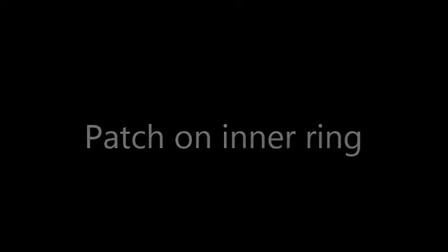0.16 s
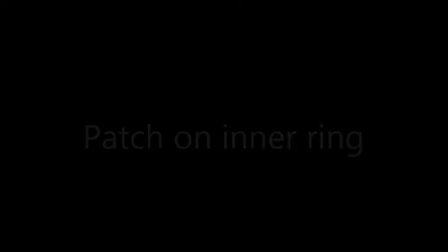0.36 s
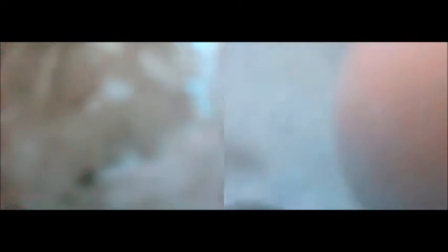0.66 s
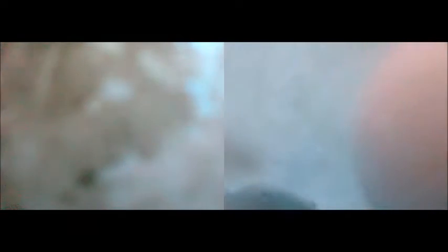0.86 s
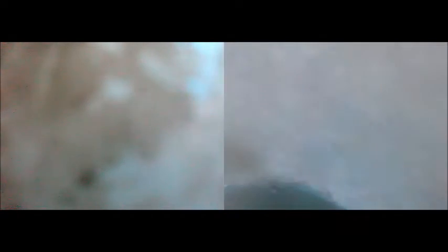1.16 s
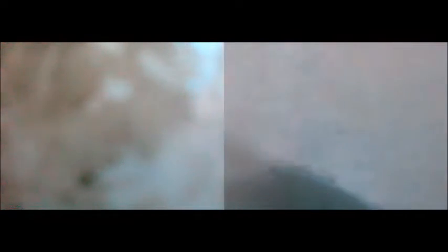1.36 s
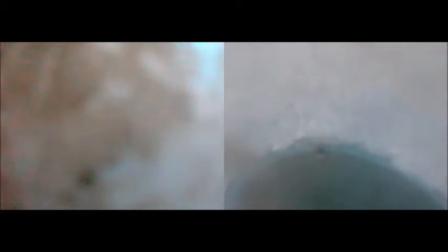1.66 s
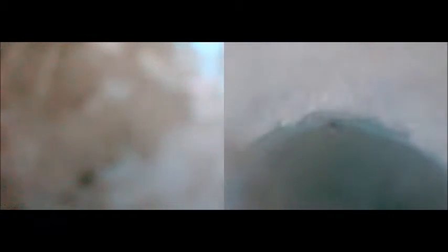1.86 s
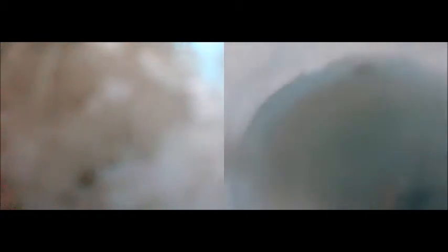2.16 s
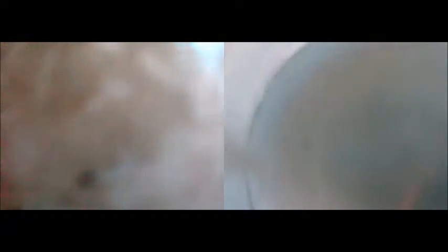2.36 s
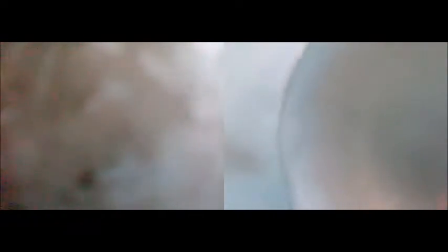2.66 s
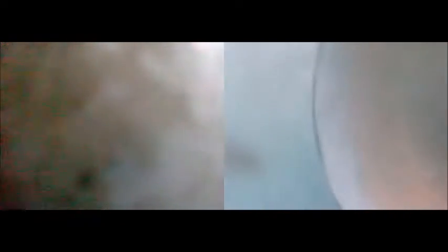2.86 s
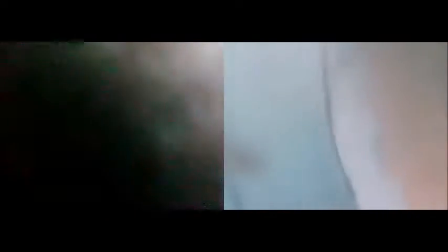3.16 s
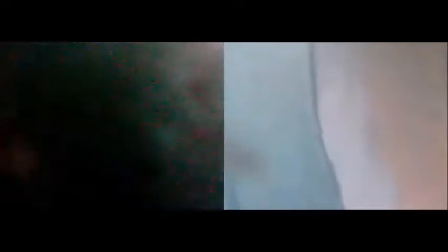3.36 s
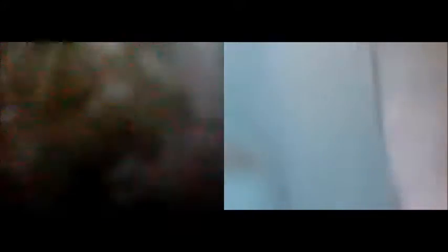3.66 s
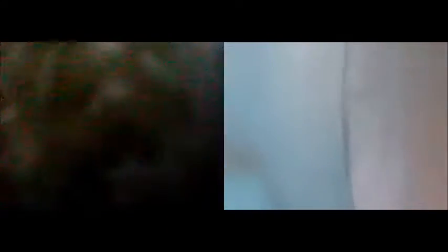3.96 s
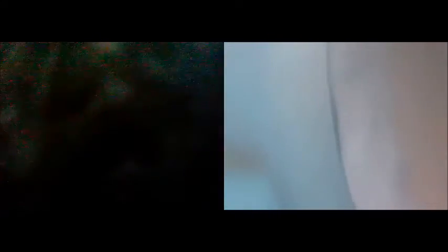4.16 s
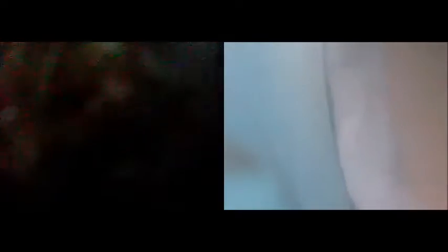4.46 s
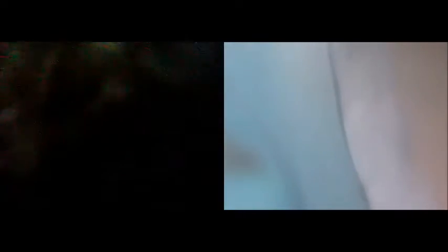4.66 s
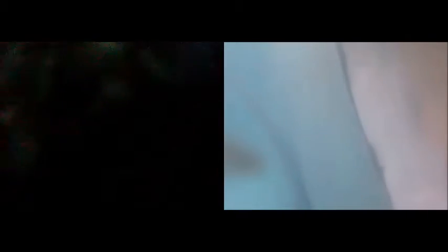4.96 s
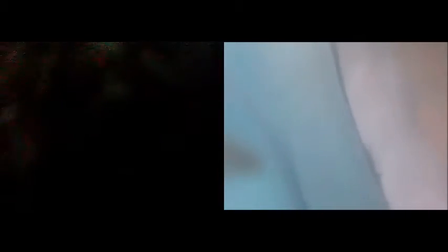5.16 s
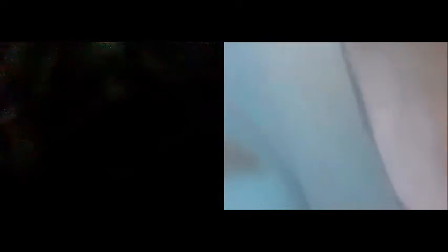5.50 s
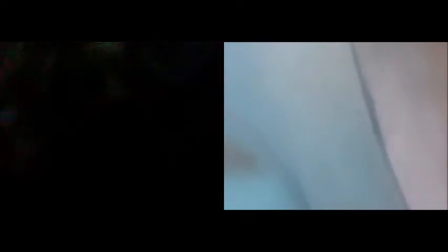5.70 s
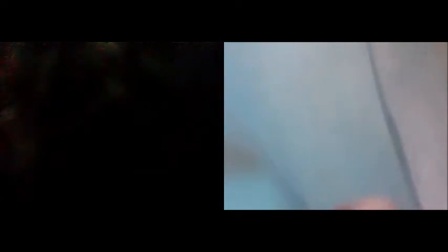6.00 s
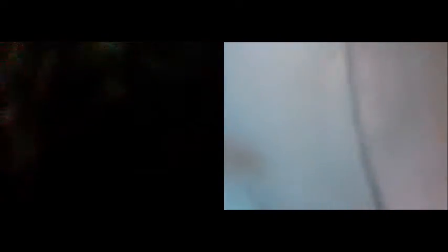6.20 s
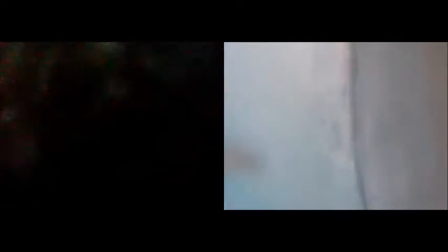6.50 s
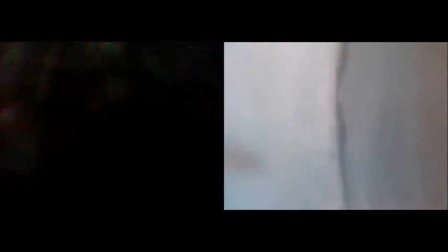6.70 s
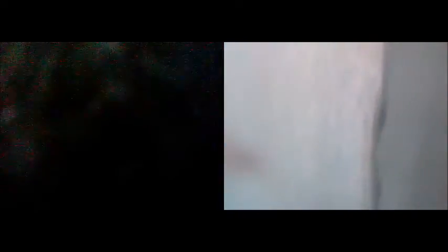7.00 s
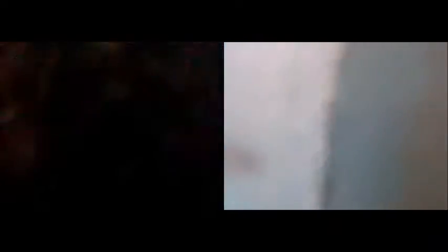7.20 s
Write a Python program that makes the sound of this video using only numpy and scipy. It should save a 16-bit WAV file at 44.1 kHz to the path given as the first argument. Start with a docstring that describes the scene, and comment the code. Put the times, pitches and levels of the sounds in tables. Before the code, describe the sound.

After brief silence, muffled underwater handling: a loud knock, gritty scrapes, a violent overloaded clatter, small bubbles, then quiet electronic pulses and a last scrape.

```python
"""After a short silence: wavering, slowly growing hum, thin tones and hiss under slow water surges, then
an on-off high whine. An underwater camera is pushed by hand along a pool liner: friction noise through
resonances makes its slides and scrapes, chattering blows on damped modes its knocks, hard enough to overload
the microphone. A few bubbles escape as rising, decaying sines. Water, hiss and whine are shaped noise;
hum and tones, sines."""
import sys
import numpy as np
from scipy import signal
from scipy.fft import rfft, irfft, next_fast_len
from scipy.io import wavfile
from scipy.ndimage import uniform_filter1d, map_coordinates

SR = 44100
rng = np.random.default_rng(int(sys.argv[2]) if len(sys.argv) > 2 else 0)


def write(x):
    x = np.atleast_2d(x).T
    wavfile.write(sys.argv[1], SR, np.round(np.clip(x, -1, 1) * 32767).astype(np.int16))


N = 323694


def amp(db):
    """Decibels to amplitude."""
    return 10 ** (np.asarray(db) / 20)


def unit(x):
    """x scaled to rms 1."""
    return x / np.sqrt(np.mean(x ** 2) + 1e-20)


def clock():
    """Time of every sample in seconds."""
    return np.arange(N) / SR


def add(track, start_s, sound):
    """Mix a sound in at start_s, cut at the end of the track."""
    part = track[round(start_s * SR):][:len(sound)]
    part += sound[:len(part)]


def wobble(knots_per_s):
    """A smooth random curve through normal random knots."""
    knots = rng.standard_normal(int(N * knots_per_s / SR) + 4)
    return map_coordinates(knots, [np.arange(N) * knots_per_s / SR], order=2)


def sine(phase):
    """A sine at rms 1."""
    return np.sqrt(2) * np.sin(phase)


def coloured(x, points, extra_db=lambda hz: 0):
    """x filtered to a curve of (freq_hz, relative level_db) points, at rms 1."""
    size = next_fast_len(len(x) + 4096)
    hz = np.fft.rfftfreq(size, 1 / SR) + 1  # + 1 keeps the logarithm finite
    point_hz, point_db = np.transpose(points)
    curve_db = np.interp(np.log(hz), np.log(point_hz), point_db)
    octaves_above = np.maximum(np.log2(hz / point_hz[-1]), 0)
    octaves_below = np.maximum(np.log2(point_hz[0] / hz), 0)
    rolloff_db = 200 * octaves_above + 20 * octaves_below
    gain = amp(curve_db - rolloff_db + extra_db(hz))
    return unit(irfft(rfft(x, size) * gain, size)[:len(x)])


def edge(x, hz, kind, order):
    """A causal Butterworth high-pass or low-pass."""
    sections = signal.butter(order, min(hz, .45 * SR), kind, fs=SR, output="sos")
    return signal.sosfilt(sections, x)


def slips(size, per_s, spread_db, smooth):
    """Tiny stick-slip impulses of uneven strength over smooth friction noise."""
    happens = rng.random(size) < per_s / SR
    sign = np.sign(rng.standard_normal(size))
    strength = amp(spread_db * rng.standard_normal(size))
    return unit(happens * sign * strength) + smooth * rng.standard_normal(size)


def ring(modes, t, scatter_db):
    """Damped modes (freq_hz, level_db, t60_s) of alternating sign, each struck with random strength."""
    out = np.zeros(len(t))
    for k, (hz, db, t60_s) in enumerate(modes):
        decay = amp(db + scatter_db * rng.standard_normal() - 60 * t / t60_s)
        out += (-1) ** k * decay * np.sin(2 * np.pi * hz * t)
    return out


def water(contact, rest_db=-46, stir_db=-30, stir_power=0.28, stir_s=.25, lap_db=-66):
    """Slow pressure swells that grow while the housing is moved, and faint lapping from the surface."""
    # surge spectrum: freq_hz, relative level_db
    surge_colour = [(4, 7), (14, 7), (30, -12), (60, -14), (100, -22), (200, -34.5), (400, -40),
                    (900, -67.5)]
    lap_colour = [(200, -1.5), (500, -0.5), (900, -3), (1400, -9.5), (3000, -24.5)]
    motion = np.abs(uniform_filter1d(np.abs(contact), int(stir_s * SR)))
    push = (amp(rest_db) + amp(stir_db) * motion ** stir_power) * amp(0.73 * wobble(7.7))
    surge = push * coloured(rng.standard_normal(N), surge_colour)
    lapping = coloured(slips(N, per_s=690, spread_db=1.5, smooth=0.91), lap_colour)
    return surge + amp(lap_db + 0.69 * wobble(3.9)) * lapping


def hum(mains_hz=59.3, mains_db=-63, double_db=-63, waver_db=2.5, grow_db_per_s=1.0):
    """Mains hum and its octave, wavering and slowly growing; the levels are those midway through."""
    t = clock()
    out = np.zeros(N)
    for k, db in enumerate([mains_db, double_db], 1):
        level_db = db + grow_db_per_s * (t - t.mean()) + waver_db * wobble(6.5)
        out += amp(level_db) * sine(2 * np.pi * k * mains_hz * t + 0.67 * wobble(8))
    return out


def hiss(level_db=-52.7):
    """Steady electronic hiss: coloured noise with a slight flutter."""
    # hiss spectrum: freq_hz, relative level_db
    hiss_colour = [(150, -5), (300, -11), (900, -20), (1500, -20), (2800, -19.5), (3600, -17.5),
                   (4500, -6.5), (5150, -15.5), (5600, -13.5), (6600, -18), (6950, -10.5), (8200, -5),
                   (9100, -18.5), (10400, -28)]
    return amp(level_db + .6 * wobble(30)) * coloured(rng.standard_normal(N), hiss_colour)


def tones():
    """Steady thin tones of the electronics: sines with slowly drifting phase."""
    # tones: freq_hz, level_db
    tone_rows = [(4323, -73.5), (5609, -70.5), (5642, -70.5), (7574, -77.5), (7838, -70), (8226, -70.5)]
    t = clock()
    return sum(amp(db) * sine(2 * np.pi * hz * t + 1.0 * wobble(4.7)) for hz, db in tone_rows)


def warble(centre_hz=4480, swing_hz=129.2, level_db=-66.5):
    """A faint high tone of the electronics, its pitch trembling at random."""
    hz = centre_hz + swing_hz * wobble(70)
    return amp(level_db + 2.5 * wobble(60)) * sine(2 * np.pi * np.cumsum(hz) / SR)


def whine(buzz_hz=135.0, buzz=0.2, ramp_s=0.0044):
    """High noise buzzing at two harmonics of buzz_hz, gated in irregular spells, then in clock-like pulses."""
    # irregular spells, short and long: start_s, length_s, level_db
    spells = [(1.128, 0.18, -52), (1.382, 0.58, -48), (2.239, 0.064, -47.5), (2.524, 0.19, -52),
              (3.579, .107, -45.5)]
    # runs of pulses: start_s, end_s
    pulse_runs = [(4.322, 6.3), (6.397, 6.75)]
    # whine spectrum: freq_hz, relative level_db
    whine_colour = [(3000, -24.5), (4500, -7), (5200, -15), (6600, -7.5), (7300, -4), (7950, 0.5),
                    (8400, -3.5), (9100, -10.5), (10400, -24)]
    pulse_period_s, pulse_s, pulse_db = .2724, 0.057, -50
    t = clock()
    pulses = [(on_s, pulse_s, pulse_db)
              for first_s, last_s in pulse_runs
              for on_s in np.arange(first_s, last_s, pulse_period_s)]
    gate = np.zeros(N)
    for on_s, length_s, db in spells + pulses:
        inside_s = np.minimum(t - on_s, on_s + length_s - t)
        gate += amp(db) * np.clip(inside_s / ramp_s + .5, 0, 1)
    turn = 2 * np.pi * np.cumsum(buzz_hz * (1 + 0.017 * wobble(35))) / SR
    chop = unit(1 + buzz * (np.cos(2 * turn) + np.cos(3 * turn)))
    return gate * coloured(chop * rng.standard_normal(N), whine_colour)


def bubble(hz, t60_s, glide_per_s=0.13, attack_s=.0015):
    """One pocket of air rings and rises a little in pitch; peak 1."""
    t = np.arange(SR // 4) / SR
    envelope = amp(-60 * t / t60_s) * (1 - np.exp(-t / attack_s))
    tone = np.sin(2 * np.pi * hz * t * (1 + glide_per_s * t)) * envelope
    return tone / np.abs(tone).max()


def bubbles(gurgle_db=-49, gurgle_hz=780, cycles=24, count=30):
    """Single bubbles, air shaken loose by the scrapes, and a short gurgle of small ones that thins out."""
    # bubbles and air pockets: start_s, peak_db, pitch_hz, t60_s
    bubble_rows = [(2.29, -24.5, 890, 0.035), (2.697, -28, 136, .12), (2.825, -38, 648, 0.046),
                   (2.93, -42.5, 427, 0.055), (3.076, -31.5, 910, 0.023), (3.74, -15.5, 920, 0.12),
                   (3.75, -34, 460, 0.19), (4.352, -34.5, 857, 0.16), (7.232, -32, 479, .16),
                   (7.236, -46, 725, 0.62), (7.236, -37.5, 1024, .1)]
    from_s, to_s = 2.95, 3.42  # gurgle
    out = np.zeros(N)
    for start_s, db, hz, t60_s in bubble_rows:
        add(out, start_s, amp(db) * bubble(hz, t60_s))
    times_s = rng.triangular(from_s, from_s + (to_s - from_s) / 4, to_s, count)
    for start_s, (size, strength) in zip(times_s, rng.standard_normal((count, 2))):
        hz = gurgle_hz * np.exp(0.5 * size)
        add(out, start_s, amp(gurgle_db + 2.5 * strength) * bubble(hz, cycles / hz))
    return out


def slides(trim_db=-3.0, tail_db=-17, contact_db=4, edge_db=7, flatness=2.4):
    """Light contact: a grainy friction swish swells and fades, inside a fainter one three times as long."""
    # slides: middle_s, length_s, level_db (before trim_db), contact_hz
    slide_rows = [(1.665, 0.3, -37, 2180), (1.974, 0.19, -43.5, 1960), (2.155, 0.075, -36, 2000),
                  (2.245, 0.14, -38.5, 1300), (2.517, 0.15, -49, 1500), (3.379, 0.45, -56.5, 1500),
                  (3.644, 0.13, -36, 1310), (4.184, 0.085, -40, 940), (4.249, 0.043, -36.5, 895),
                  (4.346, 0.079, -41, 900), (4.497, 0.22, -45, 657), (6.85, 0.044, -47.5, 894)]
    # friction spectrum: freq_hz, relative level_db
    slide_colour = [(60, -16), (150, -5.5), (300, -7), (550, -4), (1000, 2.5), (1650, -6.5), (2400, -3.5),
                    (2750, -11), (4000, -13.5), (5200, -26.5)]
    out = np.zeros(N)
    t = np.arange(SR) / SR - .5
    for middle_s, length_s, db, contact_hz in slide_rows:
        away = 2 * np.abs(t) / length_s  # 1 at both ends
        main = amp(-edge_db * away ** flatness)
        tail = amp(tail_db - edge_db * (away / 3) ** 2)

        def contact_lift_db(hz):
            return contact_db / (1 + (4 * (hz / contact_hz - 1)) ** 2)

        friction = slips(len(t), per_s=2900, spread_db=1.5, smooth=0.67)
        grain = coloured(friction, slide_colour, contact_lift_db)
        add(out, middle_s - .5, amp(db) * np.hypot(main, tail) * grain)
    return out * amp(trim_db + 1.9 * wobble(50))


def scrapes(scatter_db=2, foot_db=-30.5, release_s=0.02128, judder_db=2, judder_per_s=140):
    """The housing grips the liner, judders and lets go; each stroke favours other resonances."""
    # strokes: start_s, rise_s, hold_s, level_db, contact_hz, treble_db, thud_db (re rub), squeak (x lift_db)
    scrape_rows = [(1.527, 0.024, 0.16, -43, 2200, 4, 1, 0.75),
                   (2.246, 0.0075, 0.041, -30.5, 1070, -10, -14.5, 0.84),
                   (2.577, 0.057, 0.042, -34, 4700, -3, -17, 0.68),
                   (2.635, 0.024, 0.044, -35, 438, -17, 0, .6),
                   (3.093, 0.0088, 0.0084, -44, 700, -3, -25, 0.65),
                   (3.159, 0.0046, 0.052, -48.5, 644, -4, -25, 0.72),
                   (3.559, 0.022, .01, -27.5, 2500, 9, -15.5, 0.52),
                   (3.699, .024, .027, -19.5, 1480, 4, -24, 1.02),
                   (3.847, .012, 0.061, -24.5, 900, -3, -7, 0.64),
                   (3.899, 0.037, 0.051, -22, 6670, -3.5, -10, .6),
                   (5.339, 0.075, 0.083, -51, 594, -32, 0.5, .7),
                   (7.129, .078, 0.026, -22, 822, 2.5, -28, 1.27)]
    # resonances that sing under friction: freq_hz, width_hz, lift_db (before squeak)
    singing = [(485, 47, 6), (691.3, 110, 6), (874.4, 22, 6.5), (1230, 60, 3.5), (1444, 26, 10),
               (1862, 93, 6), (2305, 130, 10.5), (2756, 57, 6.5), (3458, 79, 11.5), (3947, 190, 11.5)]
    # friction spectrum: freq_hz, relative level_db
    scrape_colour = [(60, -23.5), (300, -17.5), (500, -7.5), (950, -3.5), (1300, -5.5), (2000, -11.5),
                     (3000, -11), (4100, -18.5), (4600, -25), (5300, -26), (7800, -25), (10000, -31.5),
                     (11000, -69.5)]
    thud_colour = [(60, 6), (150, -4.5), (350, -9), (600, -23.0)]
    out = np.zeros(N)
    t = np.arange(SR // 4) / SR
    for start_s, rise_s, hold_s, db, contact_hz, treble_db, thud_db, squeak in scrape_rows:
        peaks = [(f, width, squeak * lift + scatter_db * rng.standard_normal()) for f, width, lift in singing]
        # a sharper contact stands out more
        contact_db = 7.5 + 2.5 * np.log2(contact_hz / 1000)
        peaks.append((contact_hz, contact_hz / 3, contact_db))

        def stroke_lift_db(hz):
            resonances = sum(lift / (1 + (2 * (hz - f) / width) ** 2) for f, width, lift in peaks)
            return resonances + treble_db * hz ** 2 / (hz ** 2 + 2500 ** 2)

        friction = slips(len(t), per_s=2200, spread_db=1.5, smooth=0.6)
        rub = coloured(friction, scrape_colour, stroke_lift_db)
        thud = coloured(rng.standard_normal(len(t)), thud_colour)
        rising = np.maximum(1 - t / rise_s, 0)
        releasing = np.maximum(t - rise_s - hold_s, 0) / release_s
        pressure = amp(foot_db * (rising + releasing))
        add(out, start_s, amp(db) * pressure * (rub + amp(thud_db) * thud))
    return out * amp(judder_db * wobble(judder_per_s))


def rattle(count=5, level_db=-48.5, spread_db=7, low_hz=500, high_hz=3000):
    """Tiny taps at random times while the housing rocks, as rows like those of the blows."""
    from_s, to_s = 3.165, 3.28
    return [(from_s + (to_s - from_s) * when, level_db + spread_db * (2 * force - 1), low_hz, high_hz)
            for when, force in rng.random((count, 2))]


def knocks(crack=2.01, crack_t60_s=0.015, thump_hz=138, thump_t60_s=.045, thump_db=-25.5):
    """Blows chatter to and fro, ring the water-damped housing and jolt the camera; firm ones damp more."""
    # blows: start_s, level_db (before touch_db), low_edge_hz, high_edge_hz
    # soft contacts lose the treble, glancing ones the bass
    knock_rows = [(1.4506, 0, 1080, 2500), (2.252, -23, 510, 3200), (2.717, -37, 2000, 4000),
                  (2.744, -36, 875, 2000), (2.982, -41.5, 700, 4000), (3.074, -43, 300, 3000),
                  (3.1, -44, 500, 3400), (3.162, -37.5, 550, 3400), (3.198, -35, 500, 1590),
                  (3.247, -37, 750, 2000), (3.454, -39, 597, 1300), (3.8453, 11.5, 170, 3600),
                  (3.8714, 7, 170, 2260), (3.885, 1.5, 111, 1630), (3.8956, -12, 149.5, 1000),
                  (3.904, -11, 350.4, 2000), (4.111, -30, 570, 3900), (4.4311, -9, 60, 1570),
                  (4.504, -32.5, 398, 1490), (7.326, -35, 590, 1230)]
    # touches of each blow: delay_s, touch_db
    chatter = [(0, -0.5), (.003, 0.5), (.0068, -14)]
    # housing modes: freq_hz, level_db, t60_s (free, before contact damping)
    housing = [(105, -6.5, 0.028), (218.4, -15.5, 0.026), (305.6, -8, 0.03), (520.3, 0, 0.028),
               (730, -2, .025), (962.5, 2, 0.026), (1169, -5.5, 0.007), (1250.4, -5.5, .028),
               (1416, -2.5, 0.02), (1715, -3.5, 0.031), (1990, -7, 0.025), (2298, -3, 0.04),
               (2488, -10.5, 0.02), (2964, -8, 0.029), (4880, -12.5, 0.0083)]
    out = np.zeros(N)
    t = np.arange(SR // 8) / SR
    for start_s, db, low_hz, high_hz in knock_rows + rattle():
        freedom = .6 * 2 ** (-db / 41)  # share of the free t60; halves per 41 dB
        damped = [(hz, level_db, t60_s * freedom) for hz, level_db, t60_s in housing]
        crack_decay = amp(-60 * t / (crack_t60_s * freedom))
        for k, (delay_s, touch_db) in enumerate(chatter):
            blow = ring(damped, t, scatter_db=2.0)
            blow += crack * crack_decay * rng.standard_normal(len(t))
            blow = edge(blow, low_hz, "high", order=4)
            blow = edge(blow, high_hz, "low", order=3)
            blow /= np.abs(blow).max()
            add(out, start_s + delay_s, (-1) ** k * amp(db + touch_db) * blow)
        add(out, start_s, ring([(thump_hz, db + thump_db, thump_t60_s)], t, scatter_db=1))
    return out


def scene(sound_on_s=0.5574, ramp_s=0.0024):
    """Everything reaches one microphone inside the housing, silent until sound_on_s."""
    live = np.clip((clock() - sound_on_s) / ramp_s + .5, 0, 1)
    electronics = hum() + hiss() + tones() + warble() + whine()
    contact = slides() + scrapes() + knocks()
    return (live * (water(contact) + electronics + bubbles() + contact))[None]


def record(dry, top_hz=16000):
    """The input overloads at full scale; the top treble is dulled, and nothing passes from top_hz up."""
    clipped = dry / (1 + dry ** 20) ** (1 / 20)
    hz = np.fft.rfftfreq(N, 1 / SR)
    dulled = amp(np.interp(hz, [9000, 11000, 15000], [0, -11, -15]))
    return irfft(rfft(clipped) * dulled * (hz < top_hz), N)


dry = scene()
out = record(dry)
write(out)
```